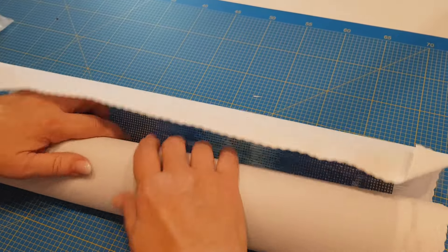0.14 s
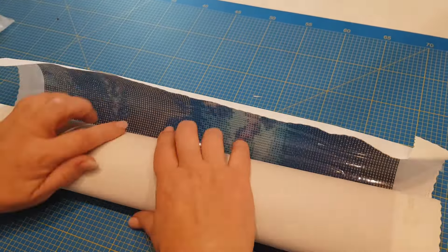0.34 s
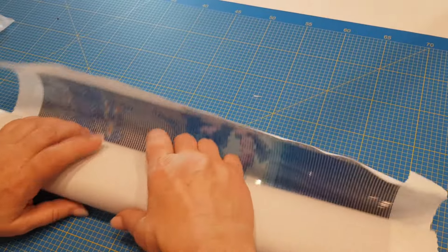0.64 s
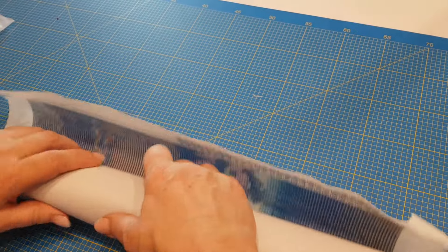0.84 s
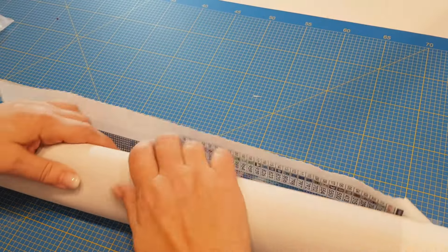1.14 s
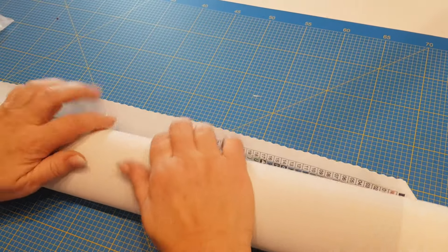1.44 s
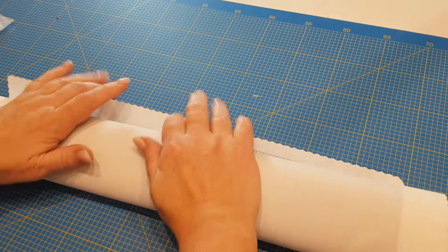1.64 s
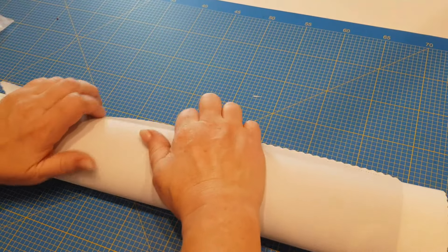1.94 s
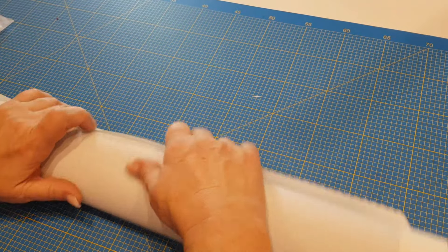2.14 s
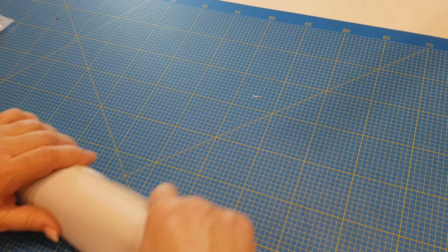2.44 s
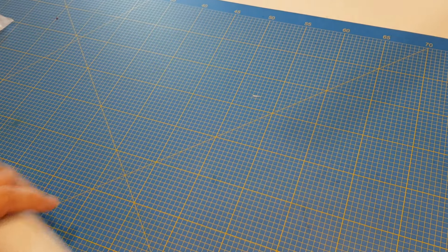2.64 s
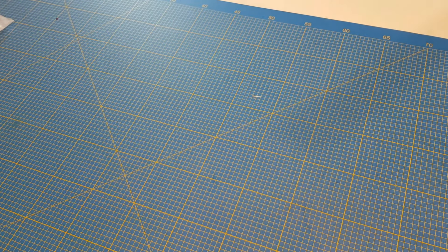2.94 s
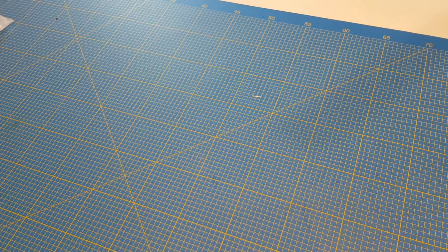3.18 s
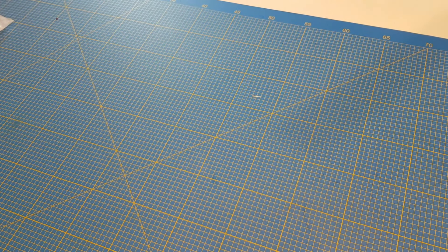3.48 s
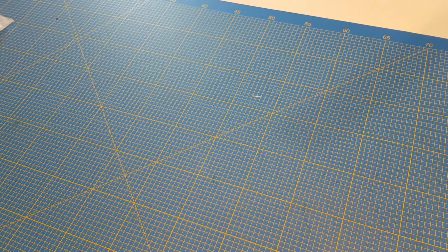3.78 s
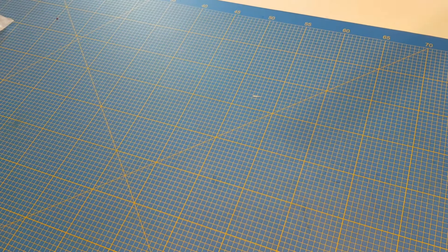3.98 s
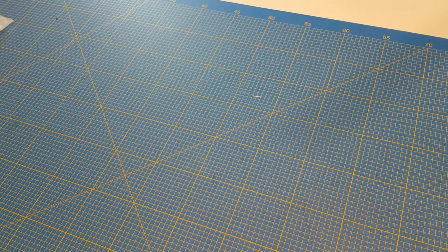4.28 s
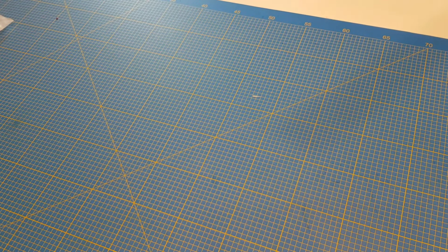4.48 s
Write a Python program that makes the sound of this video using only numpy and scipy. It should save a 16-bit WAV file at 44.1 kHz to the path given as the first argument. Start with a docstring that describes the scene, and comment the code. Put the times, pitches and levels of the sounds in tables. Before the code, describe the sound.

From the start, hands roll up a craft canvas with plastic film and paper backing on a cutting mat, close by in a small, quiet room. Short, uneven pushes make a papery rasp and a bright, crinkling hiss. The film snaps as it buckles, most sharply at about 0.3, 0.7 and 1.1 seconds, while fingertips tap softly on the hollow roll. The rubbing eases between 1.2 and 2 seconds, with a brief pitched scuff near 1.5. It grows again from 2.1 seconds, with a crisp crack and a dull bump on the table around 2.3. After 2.8 seconds it fades as the roll is dragged off the mat. Light, hard knocks come at about 2.9 and 3.4 seconds. From 3.7 seconds the roll slides faintly a little farther away and is set down with a soft thud at 4.1, followed by tiny ticks until 4.6.

```python
"""First comes a papery rub and crinkle: hands roll up a craft canvas, with its clear film and paper
backing, on a cutting mat in a small room. Each push makes many tiny slips that rasp and hiss. The film
snaps as it buckles, fingertips tap the hollow roll, and its weight bumps the table. The rubbing fades
as the roll is dragged off the mat, with a few light knocks. Then it slides and is set down softly
a little farther away."""
import sys
import numpy as np
from scipy import signal
from scipy.fft import rfft, irfft, next_fast_len
from scipy.io import wavfile
from scipy.ndimage import map_coordinates

SR = 44100
rng = np.random.default_rng(int(sys.argv[2]) if len(sys.argv) > 2 else 0)


def unload_audio(sound):
    """Save the sound as a 16-bit wav file, at the path given as the first command line argument."""
    columns = np.transpose(np.atleast_2d(sound))
    # keep every value between -1 and 1, then stretch to whole-number steps
    steps = np.round(np.clip(columns, -1, 1) * 32767)
    wavfile.write(sys.argv[1], SR, steps.astype(np.int16))


N = 203591


def amp(db):
    """Turn decibels into a number to multiply a sound by."""
    return 10 ** (np.asarray(db) / 20)


def unit(x):
    """Scale a signal to an average power of 1."""
    return x / np.sqrt(np.mean(x ** 2) + 1e-20)


def along(points, hz):
    """Read between a table's (frequency, value) points, with octaves evenly spaced."""
    f, v = np.transpose(points)
    return np.interp(np.log(hz + 1), np.log(f + 1), v)


def wobble(rate):
    """A smooth curve through `rate` random values a second."""
    return map_coordinates(rng.standard_normal(N // 8), [np.arange(N) * rate / SR], mode="wrap")


def filtered(x, response):
    """Multiply each frequency in x by response(frequency)."""
    size = x.shape[-1]
    padded = next_fast_len(size + SR // 4)
    return irfft(rfft(x, padded) * response(np.fft.rfftfreq(padded, 1 / SR)), padded)[..., :size]


def add(track, s, sound):
    """Mix a sound into a track, starting at s seconds."""
    part = track[..., max(round(s * SR), 0):][..., :sound.shape[-1]]
    part += sound[..., :part.shape[-1]]


def placed(x, lead_s, left_db):
    """A sound on the left reaches the left ear earlier and louder."""
    left = lambda hz: amp(left_db / 2) * np.exp(1j * np.pi * hz * lead_s)
    return filtered(x, lambda hz: np.array([left(hz), 1 / left(hz)]))


# How alike left and right sound: f/Hz, likeness (1 = the same)
LIKENESS = [(100, 0.71), (300, 0.9), (600, 0.71), (1200, 0.36), (2500, 0.057), (10000, 0.13)]
def spread(pair):
    """Two unrelated signals become left and right: alike in the bass, apart in the treble."""
    turn = lambda hz: np.arccos(np.clip(along(LIKENESS, hz), -1, 1)) / 2
    mid, side = filtered(pair, lambda hz: np.array([np.cos(turn(hz)), np.sin(turn(hz))]))
    return np.array([mid + side, mid - side])


def coloured(pair, tone):
    """Shape two signals with a tone table and place them a little to the left, at power 1."""
    sound = filtered(spread(pair), lambda hz: amp(along(tone, hz)))
    return unit(placed(sound, lead_s=0.00015, left_db=0.3))


def patchy(x, depth_db, width_hz, rate):
    """As the sheet bends, narrow bands of pitch swell and fade, about `rate` times a second."""
    hz, t, bands = signal.stft(x, SR, nperseg=1024)
    grid = np.meshgrid(hz / width_hz, t * rate, indexing="ij")
    swell = map_coordinates(rng.standard_normal((len(hz), len(t) // 4)), grid, order=2, mode="wrap")
    fading = along([(2000, 1.0), (12000, 0.63)], hz)[:, None]  # resonances crowd together up high
    return signal.istft(bands * amp(depth_db * fading * swell), SR, nperseg=1024)[1][:, :N]


def friction(tone, rate, life_s, scatter_db, smooth_db, patch_db):
    """Tiny uneven slips, about `rate` a second, each a dying burst of noise over a smooth rush."""
    slips = (rng.random(N) < rate / SR) * amp(scatter_db * np.clip(rng.standard_normal(N), -2, 2))
    energy = signal.lfilter([1], [1, -np.exp(-2 / (life_s * SR))], slips ** 2)
    grains = unit(np.sqrt(energy)) * rng.standard_normal((2, N))
    rush = grains + amp(smooth_db) * rng.standard_normal((2, N))
    return coloured(patchy(rush, depth_db=patch_db, width_hz=90, rate=7.0), tone)


def stroke(start_s, rise_s, hold_s, fade_db_per_s):
    """The strength of one rub: it speeds up smoothly, holds, then dies away."""
    t = np.arange(N) / SR - start_s
    rise = np.sin(np.pi / 2 * np.clip(t / rise_s, 0, 1)) ** 2
    return rise * amp(-fade_db_per_s * np.maximum(t - rise_s - hold_s, 0))


# How long the room echoes: f/Hz, ring time/s (the time to fade by 60 dB)
ECHO_TIMES = [(120, 0.42), (500, 0.2), (2000, 0.17), (6000, 0.093), (14000, 0.32)]
def room(x, wet_db):
    """The direct sound plus the room's soft echo, in which the bass lasts longest."""
    hz, t, bands = signal.stft(rng.standard_normal((2, SR // 2)), SR, nperseg=256)
    fade = amp(-60 * t / along(ECHO_TIMES, hz)[:, None])
    echo = spread(signal.istft(bands * fade, SR, nperseg=256)[1])
    echo = np.pad(echo / np.linalg.norm(echo[0]), ((0, 0), (SR // 250, 0)))  # arrives 4 ms late
    return x + amp(wet_db) * signal.fftconvolve(x, echo, axes=1)[:, :N]


# The tone of the quiet room: f/Hz, relative level/dB
RUMBLE_TONE = [(20, -22), (50, -5.5), (110, 9), (170, -5), (260, -10), (450, -8), (900, -17), (1800, -16),
               (3500, -21.5), (12000, -14.5), (16000, -24)]
def room_rumble():
    """A faint, steady, low noise lies under everything."""
    return amp(-72.0) * coloured(rng.standard_normal((2, N)), RUMBLE_TONE)


# Light, hard knocks: t/s, level/dB
KNOCK_HITS = [(2.919, -47), (3.356, -43), (3.374, -53.5), (3.457, -55.5), (3.552, -66.5)]
# The notes in each knock: f/Hz, relative level/dB, ring time/s
KNOCK_NOTES = [(334.4, -12.5, 0.12), (866, -7, 0.038), (1014, -2, 0.084), (1100, 6, 0.022),
               (1200, -5, 0.076), (1340, -16, 0.096), (2560, -13.5, 0.055)]
def knocks(rise_s):
    """Something light and hard is nudged and rings briefly."""
    track, t = np.zeros(N), np.arange(SR // 5) / SR
    for s, db in KNOCK_HITS:
        ring = sum(amp(level + rng.normal(0, 1.5) - 60 * t / ring_s) * np.sin(2 * np.pi * hz * t)
                   for hz, level, ring_s in KNOCK_NOTES)
        add(track, s, amp(db) * ring * (1 - np.exp(-t / rise_s)))
    return room(placed(track, lead_s=0.00026, left_db=1.0), wet_db=-0.5)


# The whole roll bumping the table: t/s, level/dB, f/Hz
TABLE_BUMPS = [(0.15, -50, 177), (0.301, -49.5, 113), (0.343, -53, 200), (1.077, -43.5, 200),
               (1.734, -45.5, 220), (2.182, -49, 179), (2.271, -37, 134), (2.329, -47, 136),
               (2.594, -56, 89), (2.91, -50.5, 137), (2.958, -55, 115), (4.103, -48.5, 121)]
def bumps(rise_s, ring_s, push_s, push_db):
    """The roll's weight thuds dully on the table top, with one deep push and rebound."""
    track, t = np.zeros(N), np.arange(SR // 4) / SR
    push = np.sin(np.pi * t / push_s) * (t / push_s) * np.exp(-t / push_s)
    for s, db, hz in TABLE_BUMPS:
        thud = amp(-60 * t / ring_s) * (1 - np.exp(-t / rise_s)) * np.sin(2 * np.pi * hz * t)
        add(track, s, amp(db) * (thud + amp(push_db) * push))
    return room(placed(track, lead_s=0.0001, left_db=-0.5), wet_db=-4)


# The tone of paper sliding farther away: f/Hz, relative level/dB
SWISH_TONE = [(300, -30), (500, -19), (790, 2.5), (980, -3), (1350, 0), (1650, -3), (1980, -4), (3200, -10),
              (4300, -4.5), (7600, -14.5), (12000, -15), (16000, -27)]
# The roll's last slides: start t/s, rise/s, hold/s, fade/(dB per s), paper level/dB, film level/dB
FAR_SLIDES = [(3.698, 0.032, 0.029, 96, -67, -65), (3.728, .135, 0.051, 168, -50, -62),
              (4.074, .085, .015, 106, -59, -59.5), (4.534, 0.03, 0.028, 104, -66.5, -69)]
def sliding():
    """Farther off, the paper slides with a smoother swish and the film hisses faintly."""
    swish = friction(SWISH_TONE, rate=500, life_s=0.0014, scatter_db=2, smooth_db=16, patch_db=2)
    swish = placed(swish, lead_s=0.00016, left_db=-0.5)
    hiss = friction(FILM_TONE, rate=1500, life_s=0.0005, scatter_db=2, smooth_db=4, patch_db=3)
    return sum(stroke(*timing) * (amp(paper_db) * swish + amp(film_db) * hiss)
               for *timing, paper_db, film_db in FAR_SLIDES)


# Rubs with a pitch: middle t/s, half length/s, level/dB, f/Hz, glide/(Hz per s), band width/Hz
PITCHED_RUBS = [(0.058, 0.011, -44.5, 838, -4, 268), (0.76, 0.15, -44.5, 1119, 200, 190),
                (1.486, 0.017, -38.5, 1935, 3000, 300), (1.529, 0.029, -43, 2264, 6000, 550),
                (3.031, 0.23, -63.5, 417, -220, 109), (3.202, 0.014, -55, 2875, 0, 800),
                (3.235, 0.0076, -58, 3560, 4, 1100), (3.87, .045, -57, 2196, 2, 795)]
def brushes(rough_db):
    """A brushing touch sounds one rough note of the sheet or roll, which glides as the touch moves."""
    track, t = np.zeros((2, N)), np.arange(SR) / SR - 1 / 2
    for s, half_s, db, hz, glide, width_hz in PITCHED_RUBS:
        noise = rng.standard_normal((2, 2, len(t)))
        slow_noise = unit(filtered(noise, lambda f: 1 / (1 + (f / width_hz) ** 2)))
        phase = 2 * np.pi * (hz + glide * t / 2) * t
        note = slow_noise[0] * np.cos(phase) + slow_noise[1] * np.sin(phase)
        swell = np.exp(-(t / half_s) ** 2 / 2)
        add(track, s + t[0], amp(db) * swell * note)
    return spread(track) * amp(rough_db * wobble(250))


# The bright tone of cracking film: f/Hz, relative level/dB
CRACK_TONE = [(200, -8), (900, -23), (2500, -24), (5000, 5), (7500, 4), (11000, 4.5), (16000, 2.5)]
# Snaps of the film: t/s, crack level/dB, paper pop level/dB, left minus right/dB
FILM_SNAPS = [(0.1388, -32, -38, -10.5), (0.162, -39, -36, -6), (0.2665, -37.5, -32, 1.5),
              (0.3262, -35.5, -32, -2), (0.3431, -26.5, -20, -2), (0.703, -32.5, -21.5, -6),
              (0.9745, -38, -34, 0), (0.9975, -36, -40, 3), (1.109, -36.5, -41, 0),
              (1.137, -34.5, -19.5, -3.5), (1.1908, -40.5, -40, 1), (1.55, -32, -45, -1.5),
              (1.5794, -46, -27.5, 1), (1.637, -42.5, -34.5, 1), (1.732, -39, -35.5, -3),
              (2.0307, -52, -40, 3), (2.1832, -25, -30, 1), (2.6274, -51, -32, 0), (2.881, -49, -33.5, 0),
              (3.035, -46.5, -60, -5), (3.3548, -58, -39.5, 1.5), (3.3945, -58.5, -51, 1),
              (3.5514, -57, -52.5, 0), (3.7033, -66, -57, 3), (3.934, -46.5, -46, -3),
              (4.0497, -54.5, -72, -4), (4.0774, -47, -63, 1.5), (4.341, -58.5, -72, -1),
              (4.3645, -59, -67.5, -3), (4.557, -54, -59, 0)]
def snaps(tick_db, crack_s, pop_s, flutter_s, flutter_db):
    """The film buckles with a tick and a crack; the paper under it pops and the sheet flutters."""
    cracks, pops, t = np.zeros((2, N)), np.zeros((2, N)), np.arange(SR // 25) / SR
    flutter = amp(flutter_db) * np.exp(-t / flutter_s)
    for s, crack_db, pop_db, left_db in FILM_SNAPS:
        sides = amp([[left_db / 2], [-left_db / 2]])
        tick = amp(tick_db) * (t == 0) * rng.choice([-1, 1], (2, 1))
        crack = (np.exp(-t / crack_s) + flutter) * rng.standard_normal((2, len(t)))
        pop = (np.exp(-t / pop_s) + flutter) * rng.standard_normal((2, len(t)))
        add(cracks, s + 0.0016, sides * amp(crack_db) * (tick + crack))
        add(pops, s + 0.001197, sides * amp(pop_db) * pop)
    film = filtered(spread(cracks), lambda hz: amp(along(CRACK_TONE, hz)))
    paper = filtered(spread(pops), lambda hz: amp(along(PAPER_TONE, hz)))
    return room(film + paper, wet_db=-8)


def crinkle(rate, scatter_db):
    """Creases give tiny clicks of random size, about `rate` a second, unequal left and right."""
    clicks = (rng.random(N) < rate / SR) * amp(scatter_db * np.clip(rng.standard_normal(N), -2, 1.5))
    burst = rng.standard_normal((2, SR // 200)) * np.exp(-np.arange(SR // 200) / SR / 0.00023)
    return coloured(signal.fftconvolve(clicks[None], burst, axes=1)[:, :N], CRACK_TONE)


# Fingertips landing on the roll: t/s, level/dB, f/Hz
FINGER_TAPS = [(0.22, -20, 530), (0.327, -34.5, 302), (0.342, -26.5, 690), (0.441, -37.5, 408),
               (0.573, -27.5, 460), (0.686, -22.5, 473), (0.704, -29, 570), (1.424, -21.5, 445),
               (1.602, -34, 325), (1.693, -36, 690), (1.771, -28, 530), (1.882, -34.5, 584),
               (1.929, -21.5, 556), (2.254, -36.5, 385), (2.388, -35, 327), (2.699, -32, 570),
               (3.934, -44.5, 534)]
# The notes of the hollow roll: f/Hz, relative level/dB, ring time/s
ROLL_NOTES = [(309, -22, 0.12), (432, 6.5, .14), (516, 3, .12), (591, -12, 0.037), (730, 5, 0.12)]
def taps(cycles, peak_s, ring_db):
    """A soft fingertip makes the roll swing about twice and leaves a faint hollow ring."""
    track, t = np.zeros((2, N)), np.arange(SR // 6) / SR
    ring_rise = 1 - np.exp(-(t / peak_s / 2) ** 2)
    for s, db, hz in FINGER_TAPS:
        push = np.exp(-((t - peak_s) * hz / cycles) ** 2) * np.sin(2 * np.pi * hz * (t - peak_s))
        ring = sum(amp(level - 60 * t / ring_s) * np.sin(2 * np.pi * (f * t + rng.random()))
                   for f, level, ring_s in ROLL_NOTES)
        tap = push + amp(ring_db) * ring * ring_rise
        add(track, s, amp(db) * placed(tap, lead_s=0.00008, left_db=1.5))
    return room(track, wet_db=-4.0)


# The roll's light, steady rub, fading as it leaves the mat: t/s, level/dB
MAT_CONTACT = [(0, -53), (0.2, -50), (0.45, -52.5), (1.15, -48.5), (1.32, -55), (1.66, -53), (2.05, -55),
               (2.88, -56), (3.12, -67), (3.45, -76.5), (3.7, -86.5)]
# Pushes of the hands: start t/s, rise/s, hold/s, fade/(dB per s), then level/dB of film, paper, body
HAND_PUSHES = [(-0.005, 0.054, 0.027, 318, -42, -37, -41), (0.23, 0.041, 0.086, 230, -47, -45, -49),
               (0.483, 0.042, 0.027, 199, -37.5, -35, -46.5), (0.577, 0.06, .11, 147, -36, -37, -47),
               (0.759, 0.056, .1, 125, -34, -38, -48.5), (0.93, 0.086, 0.022, 220, -38, -39, -43),
               (1.049, 0.031, 0.043, 200, -58, -53, -48), (1.194, 0.045, 0.085, 200, -50.5, -61, -66),
               (1.321, 0.058, 0.091, 203, -43.5, -48.5, -53.5), (1.44, .04, .1, 223, -45.5, -51.5, -74),
               (1.712, 0.029, .045, 359, -46, -60, -57.5), (1.842, 0.048, 0.051, 250, -48, -46.5, -68),
               (2.082, 0.1, 0.022, 204, -31, -37, -50), (2.232, 0.038, 0.099, 200, -40.5, -43.5, -48),
               (2.361, 0.056, 0.073, 97, -33.5, -40.5, -52), (2.54, 0.057, 0.08, 191, -36, -45.5, -56),
               (2.657, 0.03, .016, 480, -36.5, -51, -58), (2.746, .03, 0.028, 450, -37.5, -53, -57),
               (3.037, .025, 0.018, 190, -53, -80, -88), (3.15, 0.046, 0.047, 240, -56.5, -66, -67),
               (3.546, 0.019, 0.023, 144.5, -67, -78, -79)]
def rub_levels():
    """How loud film, paper and the roll's body are, in dB: each push adds to the steady rub."""
    contact_db = np.interp(np.arange(N) / SR, *np.transpose(MAT_CONTACT))
    power = np.outer(amp([2, 0, -4]), amp(contact_db)) ** 2  # rows: film, paper, body
    for s, rise_s, hold_s, fade, *levels_db in HAND_PUSHES:
        power = power + np.outer(amp(levels_db), stroke(s, rise_s, hold_s, fade)) ** 2
    return 10 * np.log10(power)


# The tones of the hollow body, the rasping paper and the hissing film: f/Hz, relative level/dB
BODY_TONE = [(25, -33), (50, -47), (90, -27), (160, -14.5), (290, -2.5), (450, 0), (620, -3), (850, -12.5),
             (1500, -29)]
PAPER_TONE = [(350, -54), (560, -5.5), (770, -4.5), (1040, -1.5), (1300, -1), (1500, -3), (1680, -5.5),
              (1950, -3.5), (2600, -7), (3600, -12.5), (6000, -19), (16000, -70)]
FILM_TONE = [(400, -36), (1300, -10), (2600, 0), (4200, 2), (5800, 1.5), (7700, -2.5), (10000, 1),
             (12000, 2), (15800, -4)]
def rubbing():
    """Coarse slips shake the hollow roll, finer ones rasp the paper, the finest hiss on the film."""
    film_db, paper_db, body_db = rub_levels()
    grip = wobble(60)  # the hands' pressure flutters
    body = friction(BODY_TONE, rate=200, life_s=0.0051, scatter_db=4.5, smooth_db=2, patch_db=1.0)
    body *= amp(body_db + 1.3 * grip)
    paper = friction(PAPER_TONE, rate=260, life_s=0.00064, scatter_db=3, smooth_db=4.5, patch_db=2.5)
    paper *= amp(paper_db + 0.8 * grip)
    flicker = wobble(70)
    film = friction(FILM_TONE, rate=1500, life_s=0.00037, scatter_db=3.5, smooth_db=7, patch_db=3.5)
    film *= amp(film_db + 1.08 * flicker)
    creases = amp(0.44 * film_db - 36.5) * crinkle(rate=45, scatter_db=13.0)  # even a light rub ticks
    bending = np.interp(np.arange(N) / SR, [2.7, 3.3], [1, 0])
    return body + paper + film + bending * creases


def scene():
    """All the sounds of handling the canvas, over the room's quiet rumble."""
    rumble = room_rumble()
    hits = taps(cycles=0.72, peak_s=0.003595, ring_db=-30.0)
    hits += bumps(rise_s=0.004, ring_s=0.11, push_s=0.0073, push_db=-10)
    hits += knocks(rise_s=0.00041)
    crackle = snaps(tick_db=9.5, crack_s=0.00064, pop_s=0.0048, flutter_s=0.0055, flutter_db=-4.0)
    return rumble + hits + crackle + rubbing() + brushes(rough_db=1.5) + sliding()


def record(dry):
    """Cut away the very highest treble, above 16100 Hz."""
    return filtered(dry, lambda hz: hz < 16100)


dry = scene()
out = record(dry)
unload_audio(out)
```